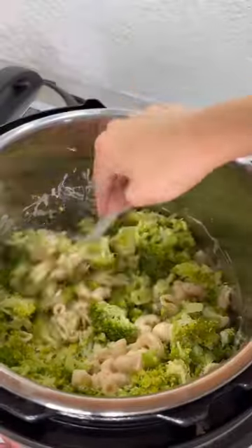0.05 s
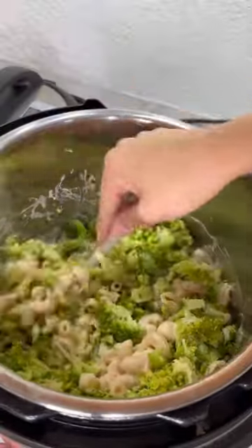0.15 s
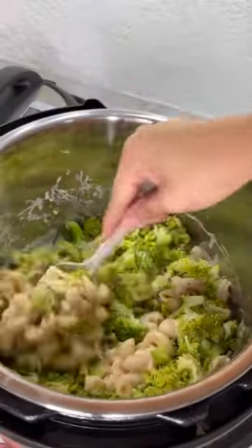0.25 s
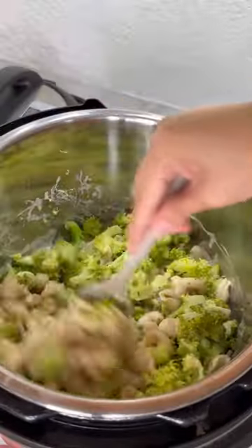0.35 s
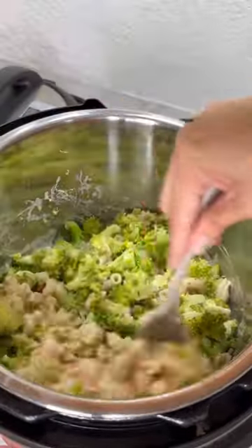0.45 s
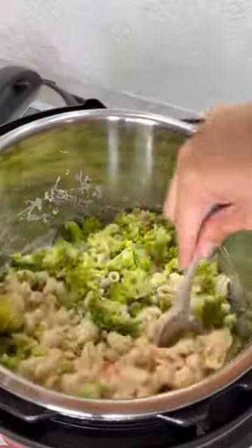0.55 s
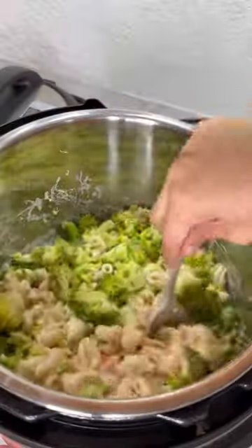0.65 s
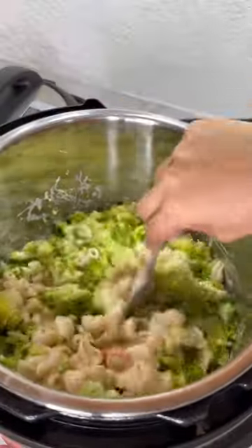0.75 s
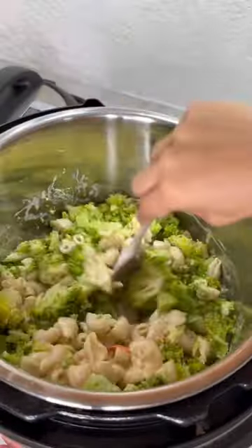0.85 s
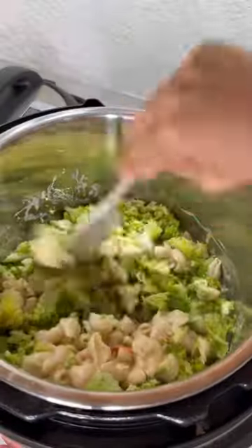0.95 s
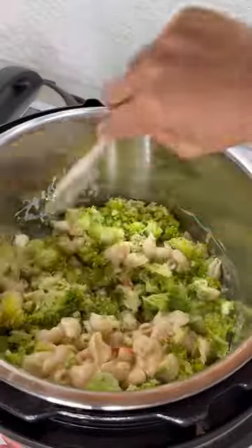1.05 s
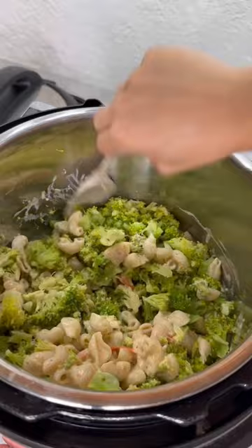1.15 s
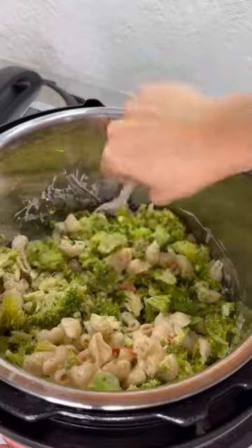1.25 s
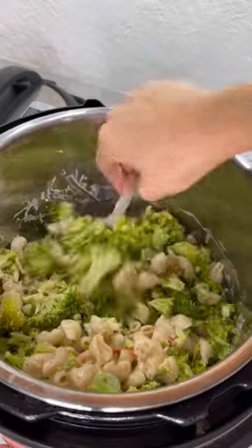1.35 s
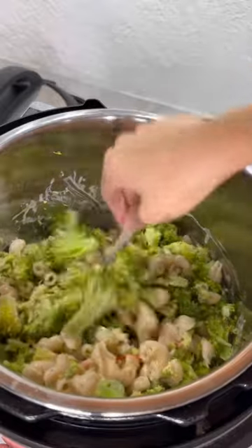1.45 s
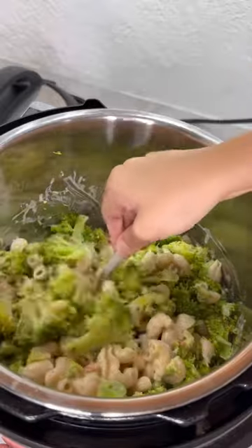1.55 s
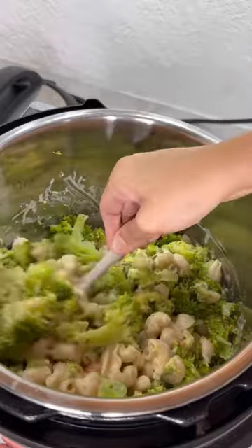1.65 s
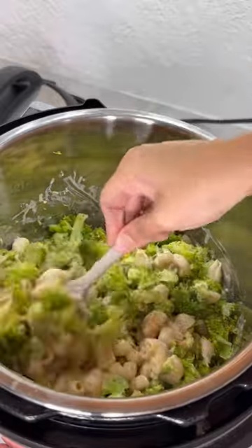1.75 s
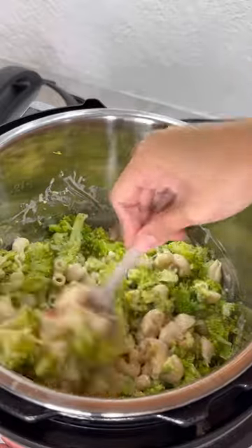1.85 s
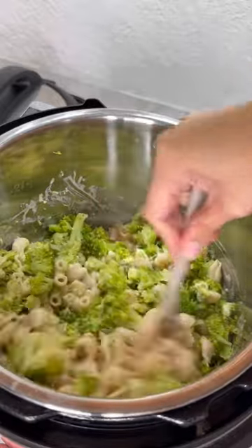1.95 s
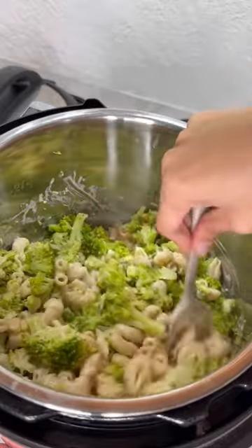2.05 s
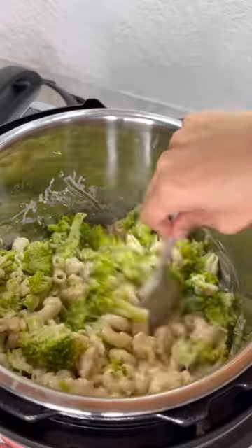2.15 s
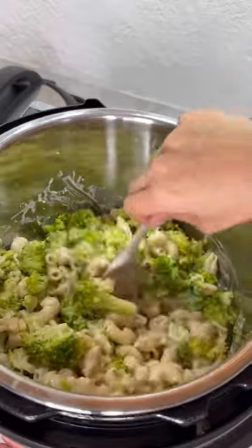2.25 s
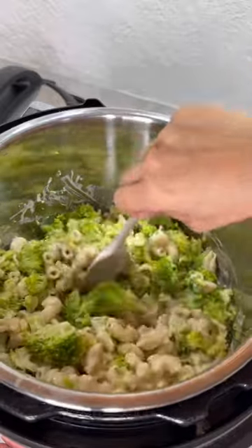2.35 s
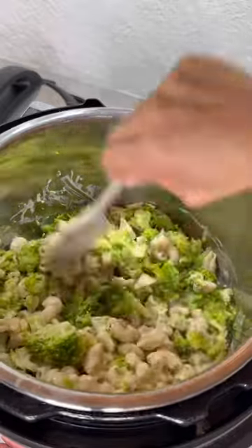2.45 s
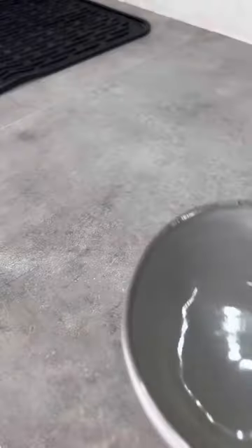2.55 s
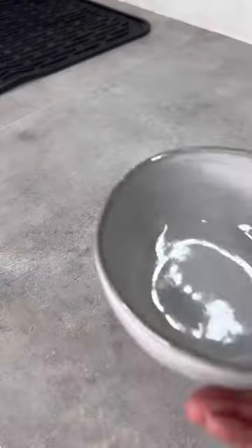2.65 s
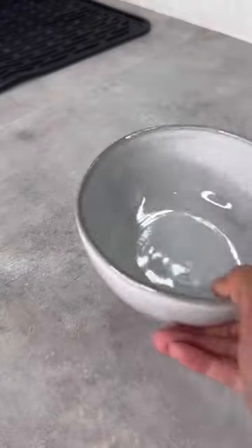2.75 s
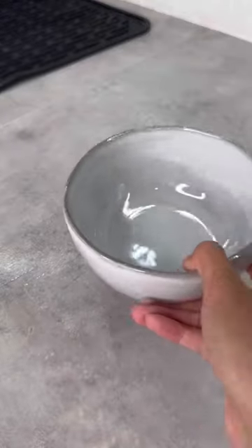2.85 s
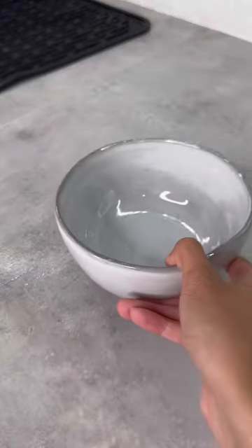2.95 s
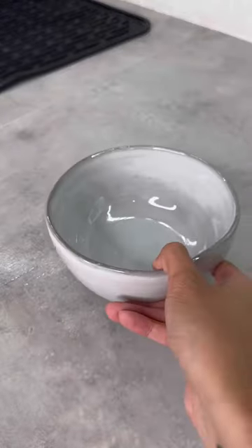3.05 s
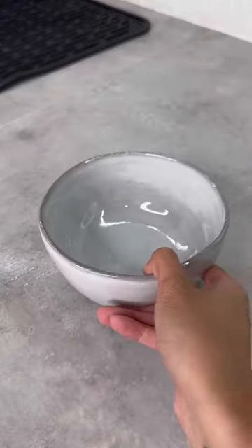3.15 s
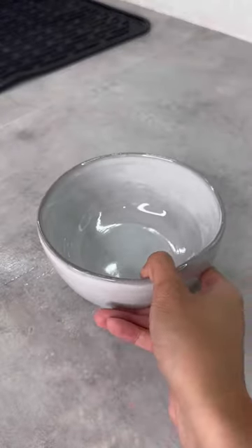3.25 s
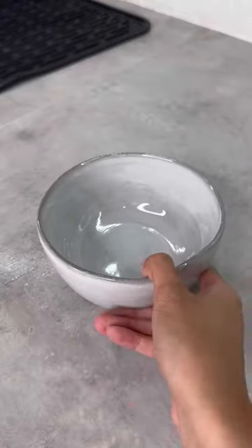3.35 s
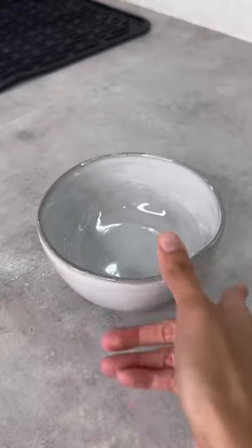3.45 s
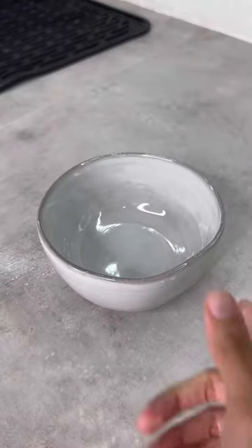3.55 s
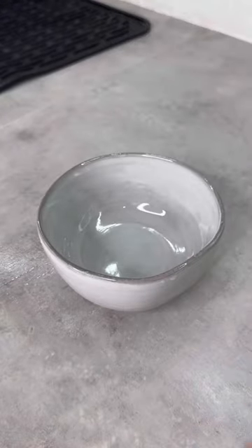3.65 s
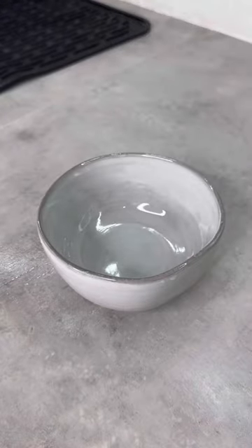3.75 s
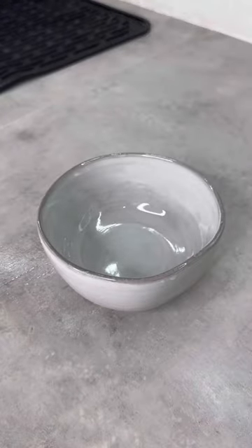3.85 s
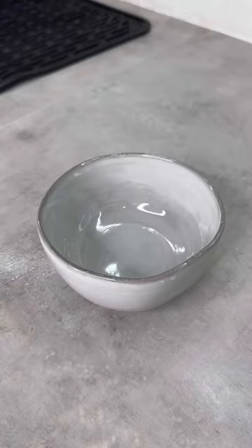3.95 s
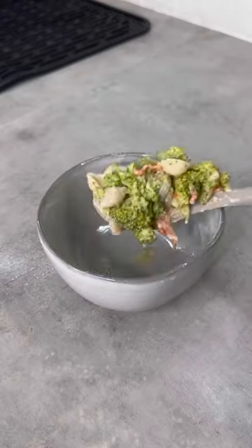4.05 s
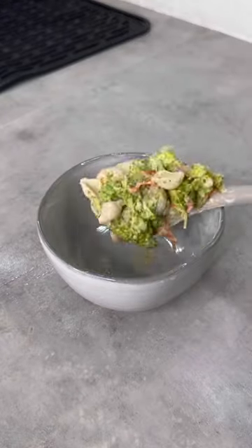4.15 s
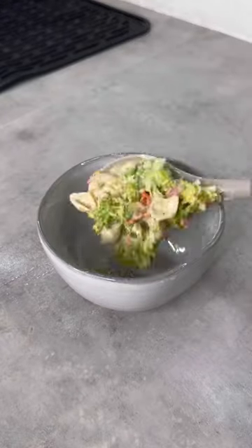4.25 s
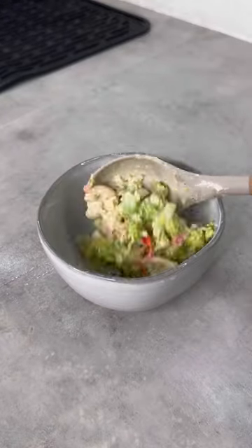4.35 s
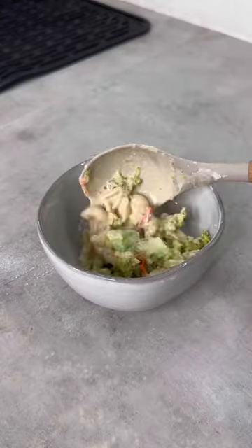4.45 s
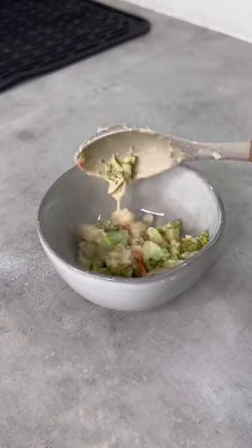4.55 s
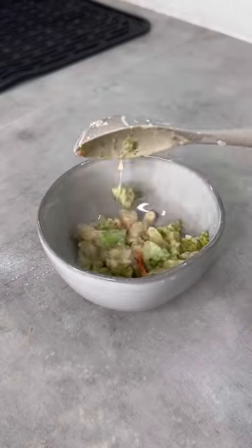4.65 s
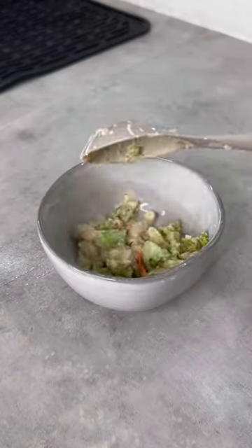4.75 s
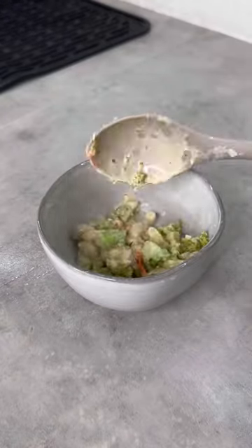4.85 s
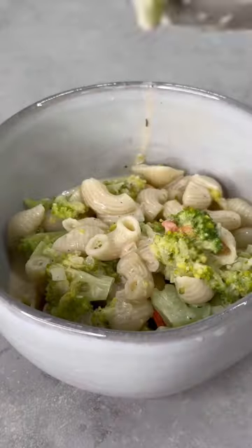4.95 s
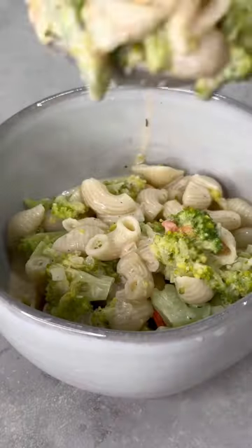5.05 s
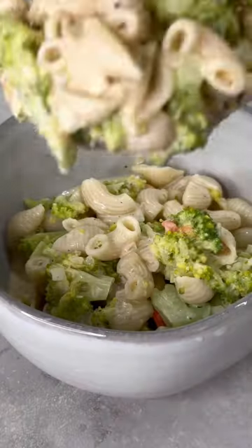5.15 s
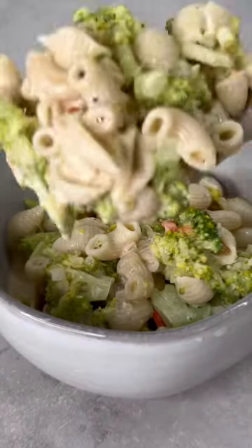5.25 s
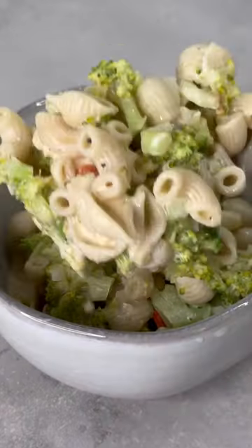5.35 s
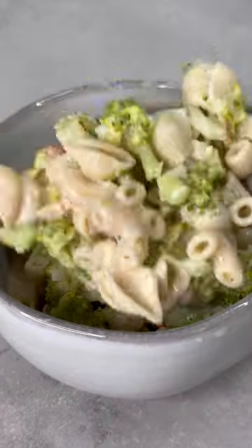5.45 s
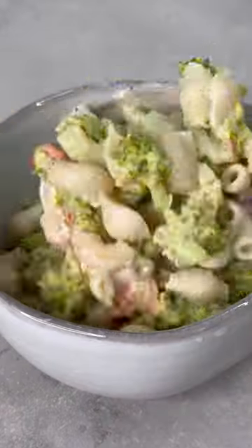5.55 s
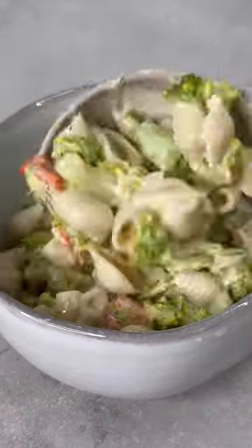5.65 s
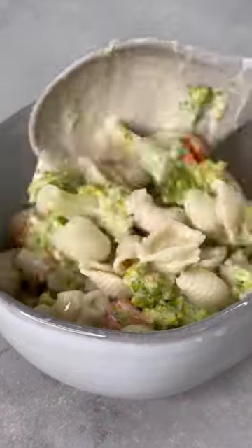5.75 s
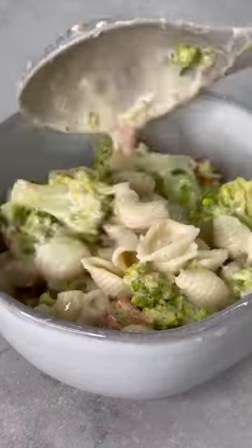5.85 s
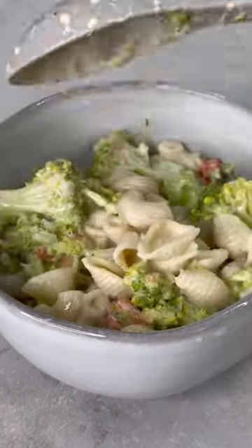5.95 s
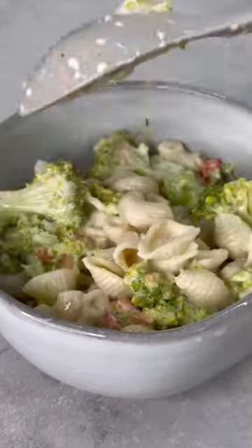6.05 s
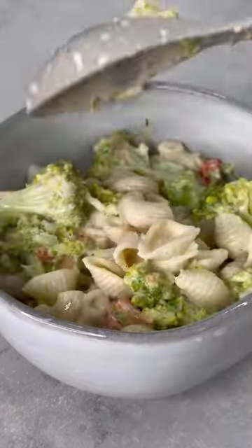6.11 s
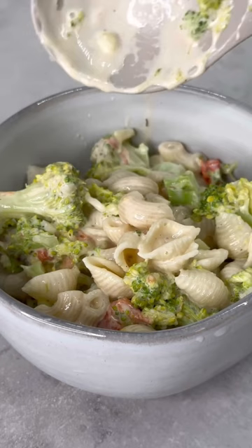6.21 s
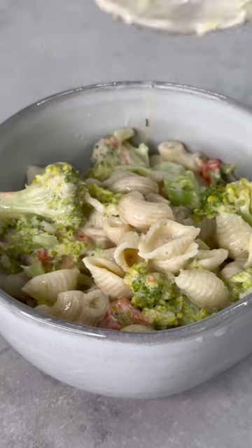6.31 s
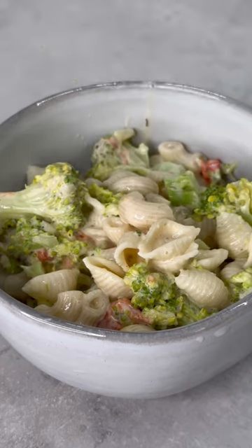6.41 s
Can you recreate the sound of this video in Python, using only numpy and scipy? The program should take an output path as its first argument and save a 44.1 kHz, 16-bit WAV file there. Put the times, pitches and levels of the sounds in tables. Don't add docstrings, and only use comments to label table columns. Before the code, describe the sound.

A spoon squelches through wet pasta in a ringing steel pot, then a ceramic bowl clacks loudly onto a counter and food plops in softly.

```python
import sys
import numpy as np
from scipy import signal
from scipy.fft import rfft, irfft, next_fast_len
from scipy.io import wavfile
from scipy.ndimage import uniform_filter1d, minimum_filter1d

SR = 44100
rng = np.random.default_rng(int(sys.argv[2]) if len(sys.argv) > 2 else 0)


def how_loud(loudness_db):
    steps = np.asarray(loudness_db, float) / 20
    return 10 ** steps


def transcribe(signal):
    frames = np.atleast_2d(signal).T
    limited = np.clip(frames, -1, 1)
    pcm = np.round(limited * 32767).astype(np.int16)
    wavfile.write(sys.argv[1], SR, pcm)


N = 285674

CUTS = [2.5055, 4.0185, 4.93]
# start in seconds, peak in dB, contact in seconds.
BOWL_BLOWS = [
    (3.175, -37.5, 0.00015),
    (3.184, -14, 0.00014),
    (3.187, -7, 0.00075),
    (3.1918, -7, 0.0013),
    (3.2068, -8.5, 0.0066),
    (3.216, -17.5, 0.00042),
]
POT_SCATTER_DB = 1.5


def at_hz(points, hz, column=1):
    points = np.array(points)
    return np.interp(np.log(hz), np.log(points[:, 0]), points[:, column])


def in_time(rows):
    s, *columns = np.transpose(rows)
    return [np.interp(np.arange(N) / SR, s, column) for column in columns]


def rms_one(x):
    return x / np.sqrt(np.mean(x ** 2) + 1e-20)


def butter(x, order, hz, kind):
    return signal.sosfilt(signal.butter(order, hz, kind, fs=SR, output="sos"), x)


def filtered(x, points, turn=0.0, lag_s=0.0):
    size = next_fast_len(N + 4096)
    hz = np.arange(size // 2 + 1) * SR / size + 1
    phase = np.exp(1j * (turn - 2 * np.pi * hz * lag_s))
    return irfft(rfft(x, size) * how_loud(at_hz(points, hz)) * phase, size)[..., :N]


def drift(rate):
    r = np.exp(-80 * np.pi * rate / SR)
    slow = signal.lfilter([1], [1, -2 * r, r * r], rng.standard_normal(N // 40 + 2002))[2000:]
    return np.interp(np.arange(N) / 40, np.arange(len(slow)), rms_one(slow))


def ring(clicks, hz, t60):
    r, w = how_loud(-60 / (t60 * SR)), 2 * np.pi * hz / SR
    return signal.lfilter([0, np.sin(w)], [1, -2 * r * np.cos(w), r * r], clicks + 1e-18)


def struck(blows, modes, scatter_db):
    out = np.zeros(N)
    strengths = rng.normal(0, scatter_db, (len(blows), len(modes)))
    for (s, peak_db, contact_s), own_db in zip(blows, strengths):
        push = np.hanning(max(3, round(contact_s * SR)) + 2)
        push = np.pad(push / push.sum(), (0, SR // 3))
        for (hz, db, t60), own in zip(modes, own_db):
            add(out, how_loud(peak_db + db + own) * ring(push, hz, t60), s)
    return out


def add(out, sound, s):
    at = round(s * SR)
    out[at:at + len(sound)] += sound[:N - at]


def bands(length):
    # frequency in Hz, left-right likeness, held between -1 and 1 when used.
    likeness = [(60, 1.0), (130, 0.96), (290, 0.61), (640, -0.78), (1410, -0.15), (3100, -0.45),
                (6820, 0.43), (15000, -1.8)]
    edges = 25 * 2 ** np.arange(0, 9.5, 0.4)
    white = rng.standard_normal((2, 2, length)).astype(np.float32)
    for k, (low, high) in enumerate(zip(edges, edges[1:])):
        mid, side = butter(white[k % 2], 2, [low, high], "band")
        hz = np.sqrt(low * high)
        alike = np.clip(at_hz(likeness, hz), -1, 1)
        yield hz, np.sqrt(1 + alike) * mid + np.sqrt(1 - alike) * side * [[1], [-1]]


def effort():
    # time in seconds, level in dB.
    sauce = [
        [(0.0, -58), (0.38, -67.5), (0.7, -57), (0.97, -73), (1.26, -72), (2.14, -60.5), (2.5, -70.5)],
        [(4.2, -91), (4.298, -66.5), (4.408, -61.5), (4.9, -105)],
        [(5.25, -109), (5.344, -69.5), (5.508, -67), (5.738, -68.5), (5.898, -71.5), (6.0, -98)],
    ]
    push_db = [-4, -9, -10]
    sauce_bright_db = [-3, -0.5, -2]
    # start in seconds, level in dB, bright part in dB re level.
    splats = [
        (0.005, -69.5, -9),
        (0.812, -42.5, -25),
        (1.156, -69, -3.5),
        (1.293, -72, 0),
        (1.383, -43.5, -20),
        (1.886, -58, -15.5),
        (2.154, -53.5, -12.5),
        (4.283, -89.5, 7),
        (4.692, -94, 7),
    ]
    rise_s, t60_s = 0.026, 0.17
    t = np.arange(N) / SR
    part_at = np.searchsorted([part[-1][0] for part in sauce[:-1]], t)
    push = how_loud(in_time(sum(sauce, []))[0] + np.array(push_db)[part_at])
    bright = push * how_loud(sauce_bright_db)[part_at]
    after = np.arange(SR // 2) / SR
    shape = (1 - np.exp(-after / rise_s)) * how_loud(-60 * after / t60_s)
    for s, db, bright_db in splats:
        start = max(s - rise_s, 0)
        add(push, how_loud(db + 12.5) * shape, start)
        add(bright, how_loud(db + 15.0 + bright_db) * shape, start)
    working = sum((t >= part[0][0]) & (t < part[-1][0]) for part in sauce)
    return 20 * np.log10(push), 20 * np.log10(bright / push), uniform_filter1d(working * 1.0, size=300)


def room_tone(level_db, working):
    # frequency in Hz, level in dB per Hz.
    tone_colour = [(20, -14.5), (35, -4.5), (52, 4.5), (97, -10.5), (180, -16.5), (290, -18.5), (380, -25),
                   (520, -26), (800, -31), (2300, -38), (9600, -49.5), (10100, -35), (10600, -49.5),
                   (13500, -54), (15300, -42), (16500, -55.5)]
    # rumble in dB, air in dB.
    shot_tone = [(-54.5, -73), (-56.5, -72.5), (-57, -74), (-57, -74.5)]
    air_follows_db = -31.5
    rumble_db, air_db = np.array(shot_tone)[np.searchsorted(CUTS, np.arange(N) / SR)].T
    air = how_loud(air_db) + working * uniform_filter1d(how_loud(level_db + air_follows_db), size=2000)
    low, high = 0, 0
    swell, flicker = how_loud(1.6 * drift(2.0)), how_loud(1.3 * drift(2.5))
    for k, (hz, noise) in enumerate(bands(N)):
        if hz < 500:
            low = low + noise * np.roll(swell, 23000 * k)
        else:
            high = high + noise * np.roll(flicker, 23000 * k)
    rumble = how_loud(rumble_db) * rms_one(filtered(low, tone_colour))
    return rumble + air * rms_one(filtered(high, tone_colour))


def crackle(level_db, bright_db, working):
    # frequency in Hz, level in dB per Hz.
    squelch = [(500, -20), (750, -71), (1050, -3.5), (1800, -1.5), (3000, 1.5), (4900, -11.5), (6500, -5.5),
               (9500, -9.5), (16000, -11.5)]
    pockets_per_s = 500
    out = np.zeros(N)
    sizes = how_loud(4.9 * np.minimum(rng.exponential(1, N), 3.2)) * rng.choice([-1, 1], N)
    born = rng.random(N) < pockets_per_s * how_loud(5 * drift(15)) / SR
    dealt = (18 * rng.random(N) ** 0.95).astype(int)
    hiss = rng.standard_normal((2, N)) * how_loud(4.5 * drift(31.0))
    patches = how_loud(1.85 * drift(22.0))
    for k, hz in enumerate(np.geomspace(800, 15500, 18)):
        grains = ring(ring(sizes * born * (dealt == k), hz, 18.0 / hz), hz, 13.0 / hz)
        wet = np.roll(patches, 9000 * (k // 3)) * rms_one(ring(hiss[k % 2], hz, 18.5 / hz))
        grains = rms_one(grains) + 1.06 * wet
        tilt = np.clip(np.log2(hz / 1800.0), 0, 1)
        out += grains * np.sqrt(hz) * how_loud(at_hz(squelch, hz) + tilt * (bright_db + 8.0))
    return how_loud(level_db - 48.5) * out * working


def rubbed_pot(level_db):
    stirring = np.arange(N) < CUTS[0] * SR
    drag = rng.standard_normal(N) * how_loud(np.minimum(level_db, -63) + 6.6 * drift(35.0)) * stirring
    murmur = ring(drag, 239.0, 0.23) + 0.98 * ring(drag, 461.0, 0.042) + 0.96 * ring(drag, 1045, 0.043)
    return how_loud(-29.5) * murmur


def hollow(x):
    t = np.arange(1800) / SR
    present = (rng.random(len(t)) < 0.12) * (t > 0.0008)
    echoes = rng.choice([-1, 1], len(t)) * present * how_loud(-15.5 - 60 * t / 0.033)
    echoes[0] = 1
    return signal.fftconvolve(x, echoes)


def pops():
    # start in seconds, peak in
    # dB, pitch in Hz, torn film in dB re peak.
    stirring_pops = [(0.02, -41.5, 4830, -22), (0.056, -58, 2980, -2), (0.095, -45, 3200, -27),
                     (0.123, -45.5, 980, -15), (0.1445, -43.5, 3820, -19), (0.209, -47.5, 9800, -8),
                     (0.2393, -44.5, 5300, -32), (0.273, -38.5, 1400, -28), (0.3476, -49.5, 6730, 3.5),
                     (0.3715, -45, 6840, -7), (0.411, -42.5, 3680, -26), (0.467, -41, 1320, -16),
                     (0.508, -43, 2430, -12), (0.548, -44.5, 2100, -48), (0.5682, -44.5, 1220, -3),
                     (0.622, -33, 2990, -17), (0.6587, -39, 2480, -25), (0.7077, -42, 2440, -6),
                     (0.72, -38, 1550, 0.5), (0.7206, -37, 2800, -22), (0.7538, -41, 3070, -10),
                     (0.7717, -35.5, 3940, -8), (0.8038, -33, 2940, -20), (0.922, -56, 1070, 7.5),
                     (0.9973, -52, 2300, -3), (1.1547, -42.5, 2820, -23), (1.2497, -46.5, 1870, -29),
                     (1.288, -39, 2960, -15), (1.306, -46.5, 990, -26),
                     (0.006, -49, 4680, -19), (0.0278, -40, 7600, -8), (0.071, -46.5, 6000, -6),
                  (0.1171, -47, 9800, -15), (0.1255, -44.5, 5600, -22), (0.1605, -44.5, 8500, -11),
                  (0.1817, -45.5, 4380, -8), (0.2314, -54, 4200, -13), (0.2552, -43, 5560, -31),
                  (0.2707, -43.5, 3160, -18), (0.2824, -45.5, 2270, -5), (0.32, -47.5, 2300, -12),
                  (0.394, -47.5, 3480, -11), (0.4172, -46.5, 7700, -17), (0.4248, -45.5, 2430, -23),
                  (0.479, -46, 1820, -20), (0.5234, -43.5, 4150, -28), (0.664, -43.5, 5700, -12),
                  (1.149, -44, 6400, -20), (1.1703, -44.5, 7850, -17), (1.279, -41, 4540, -26),
                  (1.294, -39, 6300, -31), (1.3645, -46, 2200, -19), (1.388, -46, 8160, -21),
                  (1.395, -44.5, 4440, -23), (1.459, -45, 2200, -24), (1.4856, -51, 8500, -8),
                  (1.493, -49.5, 6200, -17), (1.545, -53, 9500, -5), (1.587, -54, 8000, 1),
                  (1.612, -49, 9500, -7), (1.6555, -44, 4000, -18), (1.6635, -47, 3130, -16),
                  (1.9165, -52.5, 7100, 7), (1.9945, -52, 10600, -10), (2.054, -46, 5600, -11),
                  (2.1093, -43, 1520, -13), (2.2206, -42.5, 1860, -12), (2.282, -46.5, 8000, -24),
                  (2.299, -55, 3000, -4), (2.4934, -45.5, 6240, -24),
                     (1.349, -46, 5730, -10), (1.3723, -36, 3320, -28), (1.4315, -43, 2390, -24),
                  (1.451, -42, 1820, -34), (1.506, -45, 2800, -19), (1.5523, -46, 2440, -24),
                  (1.6323, -36.5, 1510, -14), (1.6333, -38.5, 2750, -25), (1.633, -43.5, 990, -28),
                  (1.689, -43, 7600, -4), (1.6926, -42, 1900, -27), (1.716, -44.5, 6000, -28),
                  (1.742, -42.5, 10500, -29), (1.782, -43, 3140, -11), (1.819, -44, 3020, -46),
                  (1.8557, -45.5, 3940, -27), (1.8817, -35, 4120, -12), (1.965, -47.5, 7050, -9),
                  (2.02, -43, 1310, -28), (2.052, -46.5, 1060, -20), (2.101, -44.5, 1090, -8),
                  (2.13, -41.5, 5750, -20), (2.1435, -36, 3460, -45), (2.172, -42, 3120, -23),
                  (2.207, -37, 8300, -12), (2.2519, -43.5, 1576, -6), (2.3133, -42.5, 2340, -7),
                  (2.451, -44.5, 3460, -17), (2.4904, -43.5, 3200, -16)]
    serving_pops = [(4.2058, -60, 7000, -4), (4.2437, -47.5, 2890, -14), (4.2837, -34, 9530, -4),
                    (4.3563, -55, 7160, 10), (4.3846, -46.5, 4370, -12), (4.336, -56, 3200, -15),
                    (4.3964, -49, 3340, -7), (4.4398, -43, 3230, -22), (4.49, -49, 2820, -4),
                    (4.521, -51, 1100, -25), (4.521, -40.5, 1620, -20), (4.556, -48, 3990, -9.5),
                    (4.6818, -45, 1930, -31), (4.6917, -35.5, 1725, -37), (4.708, -43.5, 6000, -16),
                    (5.2886, -47, 3910, -23), (5.3481, -60, 7650, -7), (5.3655, -49.5, 4540, -9),
                    (5.3782, -51.5, 1085, 3), (5.411, -54.5, 1068, -1), (5.4302, -48.5, 2440, -16),
                    (5.4865, -47.5, 1640, -16), (5.5008, -50, 2670, -1.5), (5.5282, -46, 3620, -21),
                    (5.5414, -45, 2610, -22), (5.5546, -46.5, 5700, -11), (5.6063, -46.5, 4780, -23),
                    (5.64, -42.5, 2560, -19), (5.653, -45.5, 8450, -4), (5.6868, -54, 2270, -5),
                    (5.721, -47.5, 5950, -6), (5.794, -51.5, 2150, -3), (5.834, -44.5, 4300, -9),
                    (5.8797, -50.5, 5870, 1), (5.885, -50, 14570, -3), (5.9303, -55, 9190, -7.5),
                    (6.095, -64, 2108, -34), (6.238, -60, 2000, -25), (6.4635, -47.5, 1705, -32)]
    out, t = np.zeros(N), np.arange(1300) / SR
    for s, peak_db, hz, film_db in stirring_pops + serving_pops:
        cycles = 5.6 + 0.64 * (peak_db + 47)
        cycles = cycles * (hz / 3000) ** 0.18
        chance, spray = rng.random(2), rng.standard_normal(len(t) + 1)
        turns = hz * t * (0.918 + 25 * t)
        fade = how_loud(-60 * t * hz / (1.96 * max(cycles, 1))) * (1 - np.exp(-(t * hz / 1.32) ** 2))
        above, below = 1.139 + 0.5 * chance[0], 0.594 + 0.25 * chance[1]
        pocket = np.sin(2 * np.pi * turns)
        pocket += 0.37 * np.sin(2 * np.pi * turns * above) + 0.32 * np.sin(2 * np.pi * turns * below)
        crack = np.diff(spray) * how_loud(film_db - 10.5 - 60 * t / 0.016) * np.minimum(1, t / 0.00015)
        add(out, how_loud(peak_db + 7.0) * hollow(pocket * fade + crack), s - 0.0004)
    return butter(out, 6, 930, "high")


def pot_blows():
    # start in seconds, peak in dB.
    knocks = [
        (0.032, -44.5),
        (0.801, -40.5),
        (0.814, -28.5),
        (1.377, -36.5),
        (1.383, -28),
        (2.254, -42),
    ]
    # frequency in Hz, level in dB, t60 in seconds.
    pot_modes = [(246.5, 2, 0.28), (539, -12.5, 0.28), (398, -19, 0.043), (177, -9.5, 0.16),
                 (770, -30, 0.54), (896, -21, 0.3), (1000, -23, 0.17), (1170, -43, .25), (1297, -23.5, 0.3),
                 (2440, -15, 0.18)]
    return how_loud(-7.0) * struck([(s, db, 0.0004) for s, db in knocks], pot_modes, POT_SCATTER_DB)


def boom(level_db, swell_s):
    # frequency in Hz, level in dB, t60 in seconds.
    counter = [(88.5, -1, 0.33), (96.5, -1.5, .32)]
    t, modes = np.arange(SR // 2) / SR, 0
    for sense, (hz, db, t60) in zip([1, -1], counter):
        modes = modes + sense * how_loud(db - 60 * t / t60) * np.sin(2 * np.pi * hz * t)
    return how_loud(level_db) * (1 - np.exp(-(t / swell_s) ** 2)) * modes


def thuds():
    # start in
    # seconds, boom in dB, knock in dB, knock in Hz.
    landings = [(0.041, -43.5, -46.5, 241.5), (0.721, -51, -69, 267), (0.817, -37.5, -38.5, 248),
                (1.087, -50, -54.5, 227), (1.383, -37.5, -28.5, 231.6), (2.262, -41, -46.5, 239),
                (2.738, -51.5, -53.5, 140.3), (4.034, -44, -46, 302), (4.115, -38.5, -45, 256),
                (4.128, -35, -40.5, 170), (4.281, -40, -40, 325), (4.296, -30, -38, 196.4),
                (4.337, -52, -55, 295), (4.398, -40, -46, 189), (4.436, -36, -64, 146),
                (4.511, -43.5, -46.5, 151.2), (4.554, -48.5, -86, 140), (4.708, -51, -70, 164.8),
                (5.383, -48, -64, 144), (5.566, -45, -40.5, 164), (5.773, -47, -46.5, 201),
                (5.8, -64, -46, 160), (6.337, -60, -57, 295.4)]
    drop, drop_s = 0.083, 0.019
    out, t = np.zeros(N), np.arange(SR // 4) / SR
    for s, boom_db, knock_db, hz in landings:
        add(out, boom(boom_db - 0.5, swell_s=0.0049), s - 0.004)
        soft = s > CUTS[0]
        squash = rms_one(butter(rng.standard_normal(len(t)), 2, [0.6 * hz, 1.5 * hz], "band"))
        squash = how_loud(-10.5 - 3.0 * (not soft)) * squash * how_loud(-60 * t / 0.38) * np.minimum(1, t / 0.0035)
        sinking = t + drop * drop_s * (1 - np.exp(-t / drop_s)) * (s > CUTS[1])
        knock = np.sin(2 * np.pi * hz * sinking) * (1 - np.exp(-(t / 0.0095) ** 2))
        cycles = 13.9 if soft else 27
        add(out, how_loud(knock_db + 7.5 - 60 * t * hz / cycles) * (knock + squash), s - 0.003)
    return out


def hisses():
    # start in seconds, length in seconds, level in dB, centre in Hz.
    slides = [(0.476, 0.039, -61.5, 1650), (0.569, 0.015, -57, 5300), (0.647, .04, -70, 7550),
              (0.768, 0.019, -51, 3000), (0.802, 0.0084, -38.5, 6400), (0.803, 0.0056, -57, 9100),
              (0.865, 0.022, -65, 6940), (2.386, 0.083, -67, 696), (3.858, .06, -82, 8300),
              (3.918, 0.11, -74, 7480), (4.024, 0.11, -75, 599), (4.28, 0.069, -63, 8900),
              (4.298, 0.13, -59.5, 303), (4.434, 0.2, -67, 290), (4.344, 0.12, -81, 970),
              (4.355, 0.03, -61.5, 8000), (4.388, 0.017, -65.5, 4140), (4.694, 0.064, -74, 1250),
              (4.706, 0.062, -78, 5400), (6.133, 0.1, -74.5, 6700), (2.597, 0.17, -82.5, 3800),
              (2.725, .05, -72, 520), (2.732, .16, -82.5, 2100), (2.727, .12, -85, 4200),
              (5.027, 0.031, -77, 8600), (6.133, 0.13, -82, 3200), (6.461, 0.016, -62.5, 644)]
    out, t = np.zeros(N), np.arange(SR // 5) / SR
    for s, length_s, db, hz in slides:
        noise = rms_one(butter(rng.standard_normal(len(t)), 2, hz * np.exp([-0.17, 0.17]), "band"))
        sag_db = -4.5 * np.minimum(t / length_s, 1)
        tail_db = -60 * np.maximum(t - length_s, 0) / 0.017
        add(out, how_loud(db + sag_db + tail_db) * np.minimum(1, t / 0.0041) * noise, s)
    return out


def grazes():
    # start in seconds, peak in dB, pitch in Hz near which modes ring most.
    pot_ticks = [
        (0.807, -41.5, 2000),
        (0.998, -61, 2390),
        (1.152, -53, 1170),
        (1.373, -52, 1800),
    ]
    # frequency in Hz, level in dB, t60 in seconds.
    pot_wall = [(1016, -17.5, 0.55), (1420, -8, .2), (1500, -26, .12), (1860, -43, 0.22), (2270, -7, 0.22),
                (2430, -20, 0.34), (2830, 1, 0.13)]
    off_pitch_db_per_octave = 27
    out = np.zeros(N)
    for s, peak_db, near_hz in pot_ticks:
        modes = [(hz, db - off_pitch_db_per_octave * abs(np.log2(hz / near_hz)), t60)
                 for hz, db, t60 in pot_wall]
        out += struck([(s, peak_db, 0.0001)], modes, POT_SCATTER_DB)
    return out


def scrape():
    # time in seconds, level in dB.
    scrape_level = [(2.15, -82), (2.2, -54), (2.3, -84), (2.36, -95), (2.4, -94), (2.49, -73), (2.51, -100)]
    slips = rng.standard_normal(N) * (rng.random(N) < 0.03)
    rubbed = rms_one(ring(ring(slips, 370, 0.012), 760, 0.0018))
    return how_loud(in_time([(0, -120)] + scrape_level)[0]) * rubbed


def bowl_on_slab():
    # frequency in Hz, level in dB, t60 in seconds.
    slab = [(128, -1.5, 0.16), (186.3, 2, .22), (215, -3, 0.15), (344.5, -5.5, 0.18), (380, -2.5, 0.12),
            (464, -8, 0.1), (560, -7, 0.077), (670, -11, 0.07), (710, -11.5, 0.07), (1100, -1, 0.028),
            (1120, -32.5, .3), (1310, -1.5, 0.03), (1790, -10.5, 0.062), (4850, -35.5, .07),
            (7304, -33.5, .15)]
    cupboard = [(160, -15, .2), (261, -14, 0.32), (298, -17, .35), (407, -14, 0.25), (641, -21.5, .33),
                (755.7, -29, 0.29), (753, -27, 0.37), (948, -27.5, .3), (1000, -19.5, 0.23),
                (1191, -32.5, 0.27), (1336, -29, .3), (1750, -25, 0.17), (2150, -30.5, .15),
                (2645, -36, 0.18)]
    foot = [(850, -9.5, .06), (990, -5.5, .08), (1100, -3, 0.051), (2750, -15, .02), (3460, -14, .02),
            (5400, -24.5, .015)]
    # start in seconds, peak in dB, contact in seconds.
    late_knock = [
        (6.463, -57, 0.00032),
    ]
    out = how_loud(-9.5) * struck(BOWL_BLOWS + late_knock, slab, scatter_db=1.5)
    out += how_loud(-11.0) * struck(BOWL_BLOWS[1:4], cupboard, scatter_db=4.0)
    return out + how_loud(-10.5) * struck(BOWL_BLOWS[1:3], foot, scatter_db=2.0)


def grit():
    # frequency in Hz, level in dB per Hz.
    grit_colour = [(180, -30.5), (300, 0), (450, -3.5), (1000, -22.5), (1600, -24.5), (2800, -37),
                   (7000, -51), (10500, -58.5), (16000, -105)]
    t, shape = np.arange(SR // 3) / SR, np.zeros(N)
    for s, peak_db, contact_s in BOWL_BLOWS:
        hardness = 0.00036 / contact_s
        add(shape, hardness * how_loud(peak_db) * (how_loud(-60 * t / 0.028) + how_loud(-22.5 - 60 * t / 0.31)), s)
    shape = butter(shape, 2, 500.0, "low")
    return how_loud(-0.5) * shape * rms_one(filtered(rng.standard_normal(N), grit_colour))


def rim_tap():
    # start in seconds, peak in dB, contact in seconds.
    taps = [
        (4.690, -44.5, .00002),
        (4.708, -56, .00002),
    ]
    # frequency in Hz, level in dB, t60 in seconds.
    bowl_modes = [(1083, -16, 0.6), (1175, -23.5, 0.13), (1260, -16, .2), (960, -10, .02), (1250, 4, 0.03),
                  (5300, -2.5, 0.022), (6030, -6, 0.014), (14900, 25, 0.024)]
    return struck(taps, bowl_modes, scatter_db=7.0)


def kitchen(x):
    # frequency in Hz, t60 in seconds, level in dB.
    decay = [(61.56, 0.49, -29), (240, 0.42, -16), (680, 0.37, -6), (2030, 0.51, -25), (3200, 0.31, -17.5),
             (4960, 0.25, -17.5), (9910, 0.093, -5)]
    # frequency in Hz, level in dB.
    tail_width = [(100, -5.5), (300, -9), (700, -4), (2000, 1.5), (8000, 1.5)]
    t, tail = np.arange(SR // 2) / SR, 0
    for hz, noise in bands(len(t)):
        mid = noise.mean(axis=0)
        wide = mid + (noise - mid) * how_loud(at_hz(tail_width, hz))
        tail = tail + wide * how_loud(at_hz(decay, hz, column=2) - 60 * t / at_hz(decay, hz))
    return signal.fftconvolve(x[None], how_loud(-26.5) * tail * np.minimum(1, t / 0.005), axes=1)[:, :N]


def ports(x):
    # frequency in Hz, side in dB re source.
    port_side = [(60, -38.5), (200, -18.5), (380, -17.5), (700, -4), (1300, -14.5), (3000, -8.5),
                 (8000, -3), (11000, 2), (16000, -4.5)]
    return x + filtered(x, port_side, turn=3.5, lag_s=0.0011) * [[1], [-1]]


def scene():
    level_db, bright_db, working = effort()
    food = crackle(level_db, bright_db, working) + pops() + hisses()
    pot = rubbed_pot(level_db) + pot_blows() + grazes() + scrape()
    bowl = bowl_on_slab() + grit() + rim_tap()
    bowl = butter(bowl, 2, 75, "high")
    add(bowl, boom(-7, swell_s=0.008), 3.187)
    near = food + pot + bowl + thuds()
    return ports(near) + kitchen(near) + room_tone(level_db, working)


def top_cut(x):
    return signal.sosfilt(signal.butter(12, 16640, fs=SR, output="sos"), x)


def record(dry):
    # frequency in Hz, level in dB.
    sum_colour = [(20, -17.5), (45, -1), (70, 1.5), (10500, 0.5), (11300, -10), (14000, -17.5), (15000, -6.5),
                  (15900, -6), (16300, -58)]
    difference = [(1300, 0.5), (1800, -11.5), (2500, -2), (3600, -6.5), (5000, 6), (6600, -12.5),
                  (7800, -1), (15600, 3.5), (16000, -54)]
    narrower = [(1300, -3.5), (1700, -18), (7200, -5), (8000, 0.5)]
    t = np.arange(N) / SR
    side = filtered((dry[0] - dry[1]) / 2, difference)
    side = np.where(t < CUTS[-1], side, filtered(side, narrower))
    both = filtered(dry.mean(axis=0), sum_colour) + side * [[1], [-1]]
    joins = np.ones(N)
    for s in CUTS:
        joins *= 1 - 0.9 * (t >= s) * np.exp(-np.maximum(t - s, 0) / 0.021)
    room_left = np.minimum(1, 0.8 / (np.abs(both).max(axis=0) + 1e-9))
    both = both * uniform_filter1d(minimum_filter1d(room_left, size=441), size=441)
    return top_cut(both * uniform_filter1d(joins, size=60))


dry = scene()
out = record(dry)
transcribe(out)
```